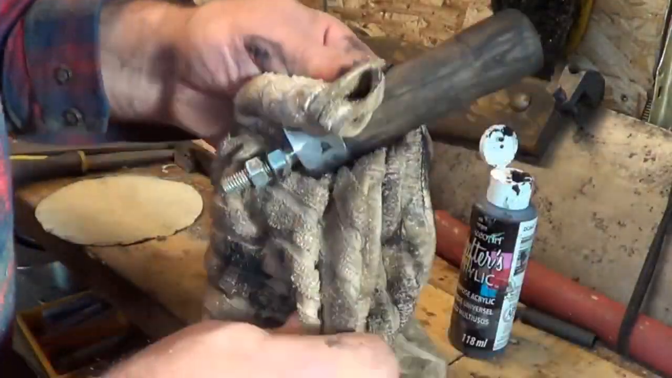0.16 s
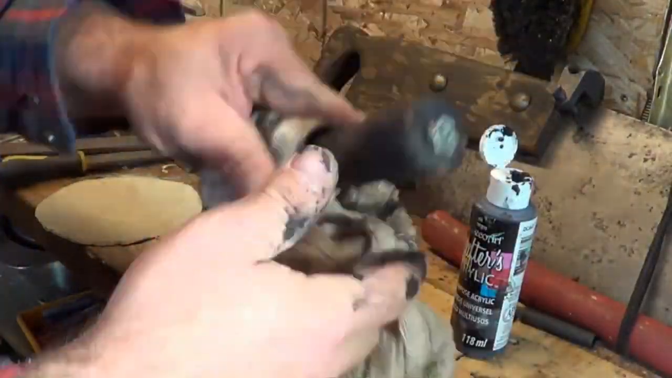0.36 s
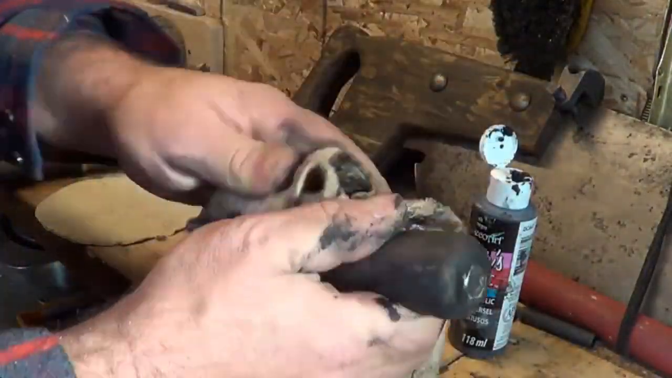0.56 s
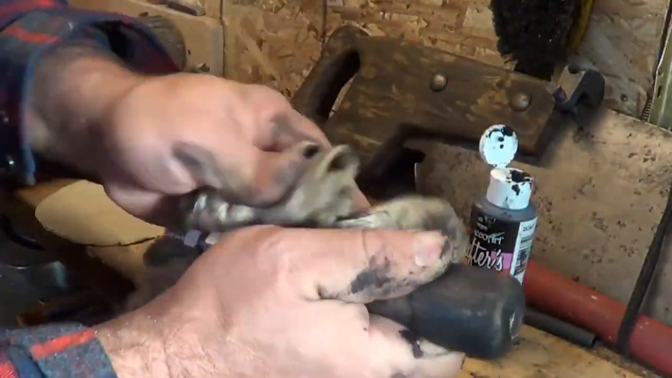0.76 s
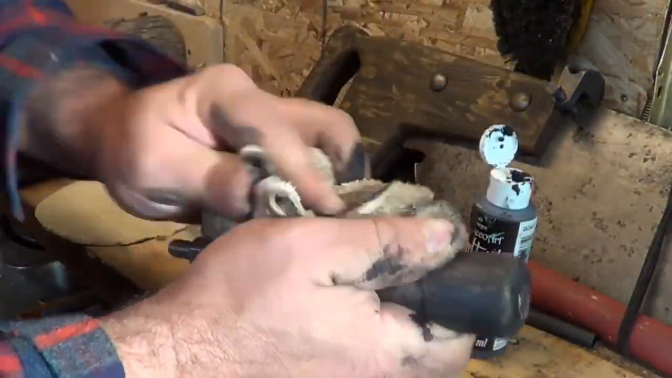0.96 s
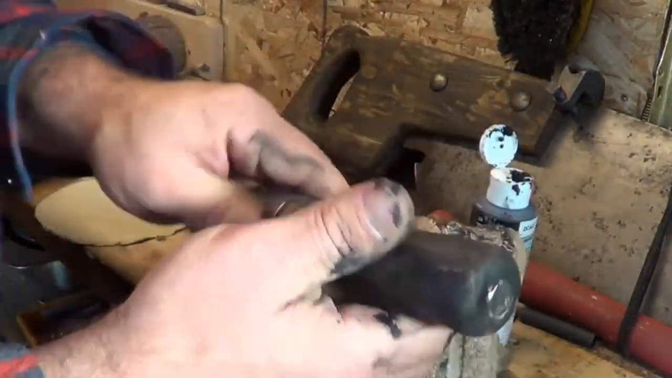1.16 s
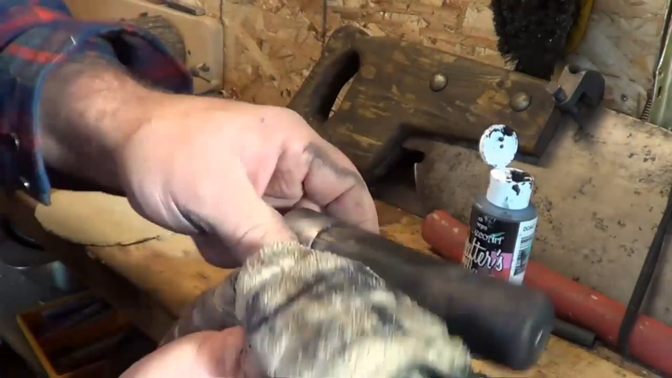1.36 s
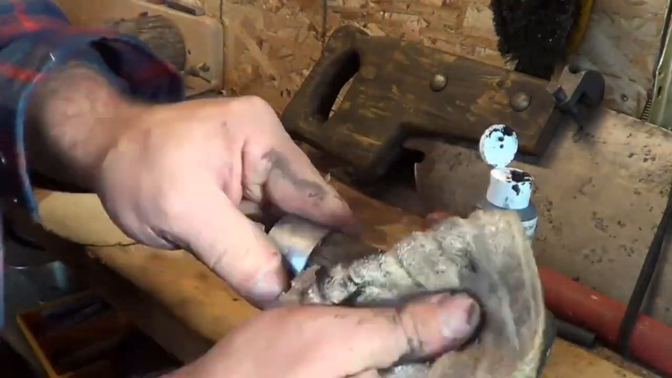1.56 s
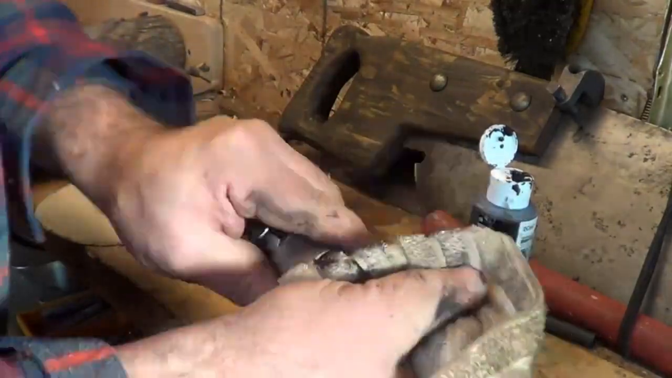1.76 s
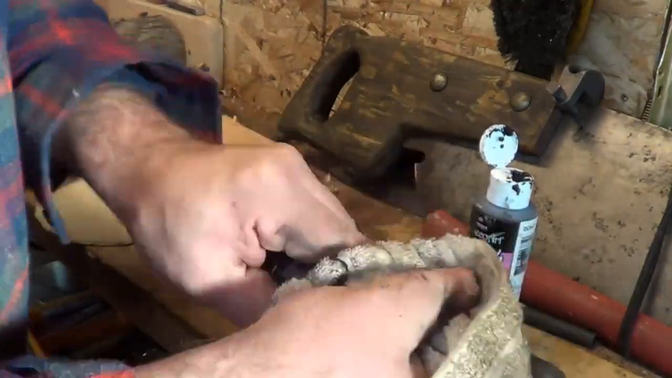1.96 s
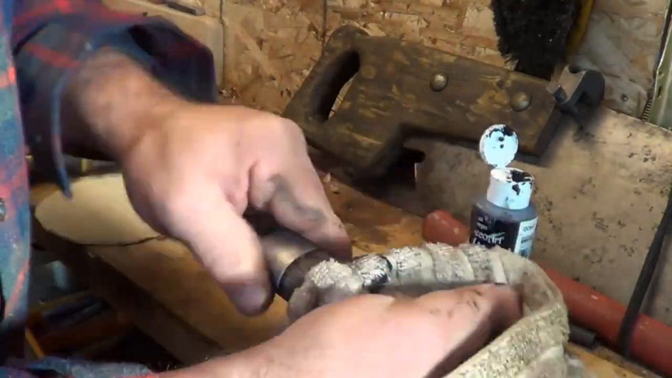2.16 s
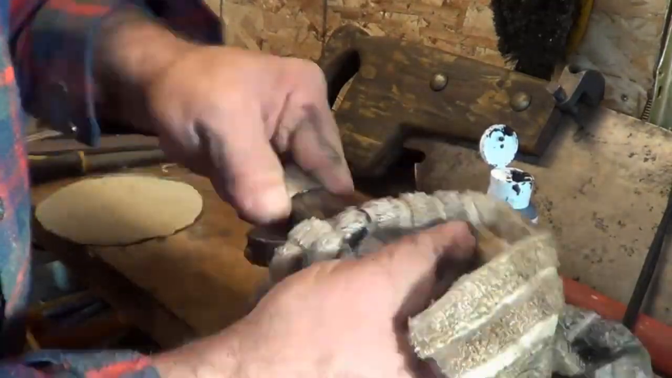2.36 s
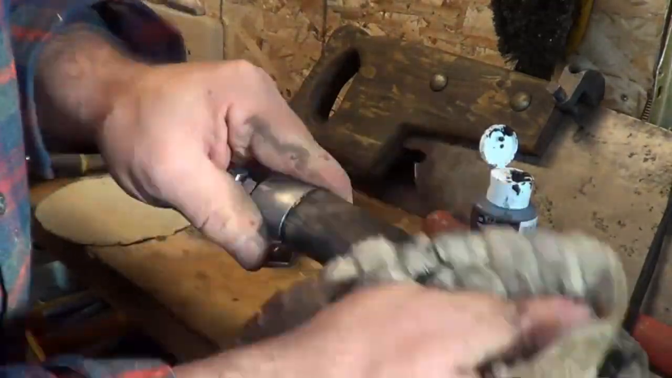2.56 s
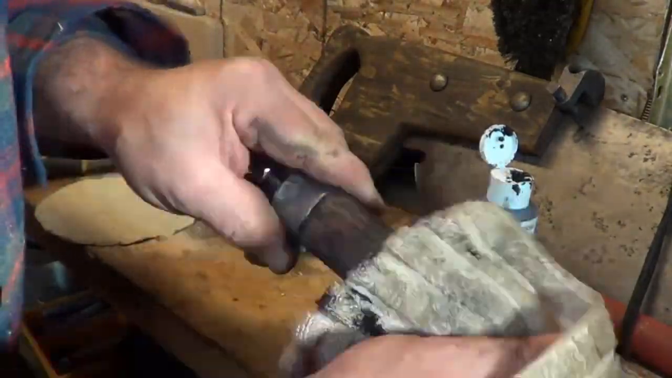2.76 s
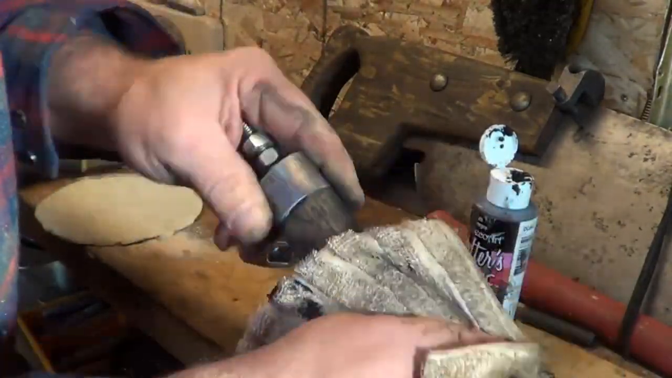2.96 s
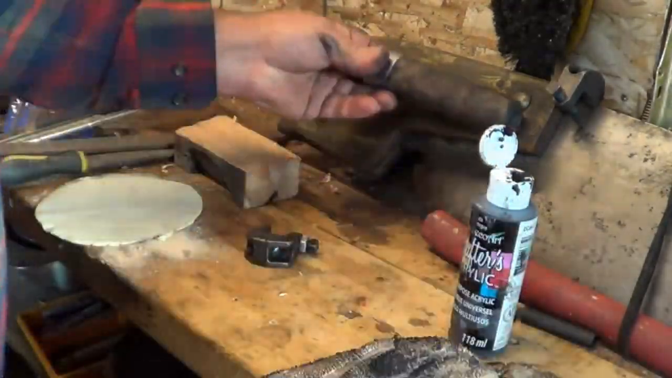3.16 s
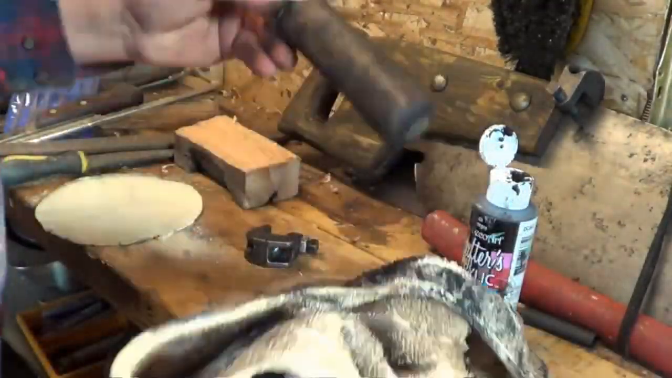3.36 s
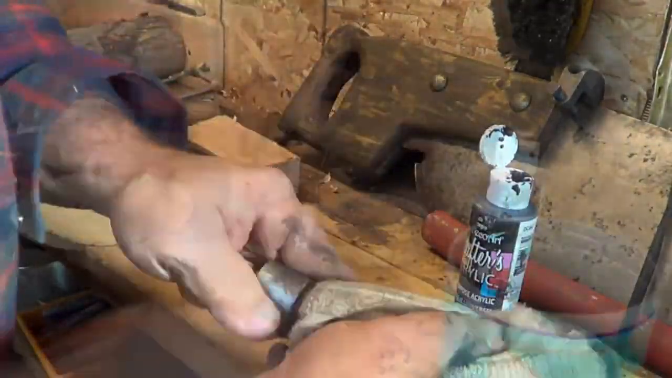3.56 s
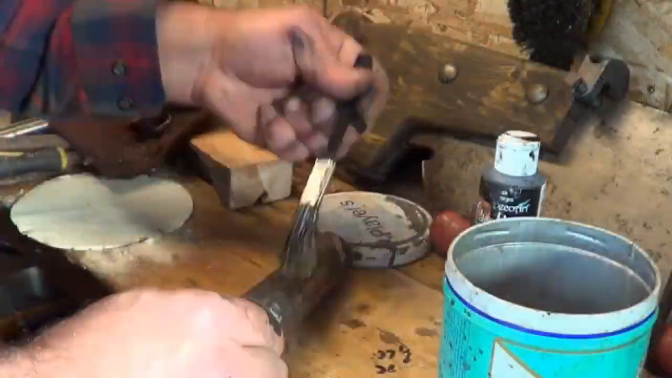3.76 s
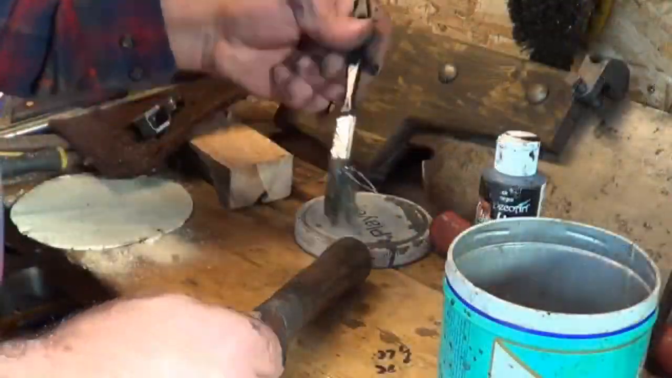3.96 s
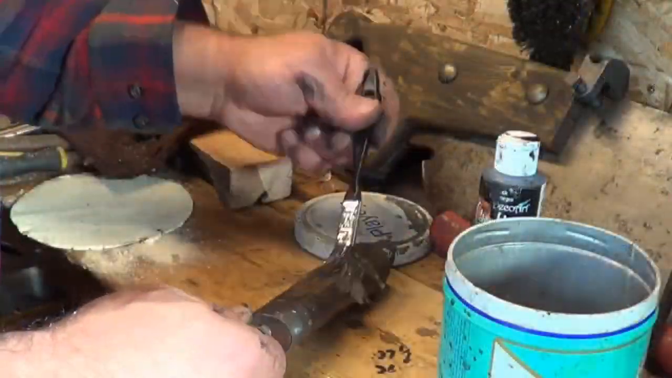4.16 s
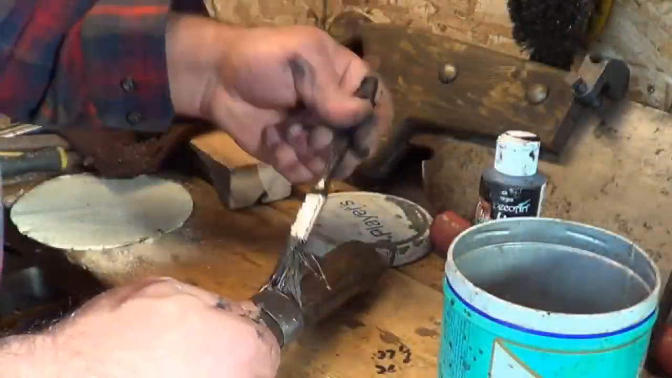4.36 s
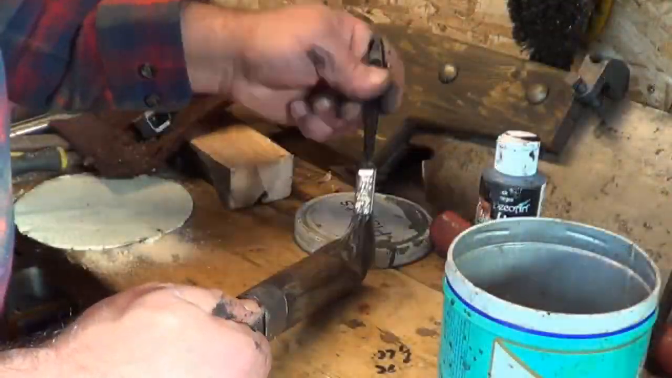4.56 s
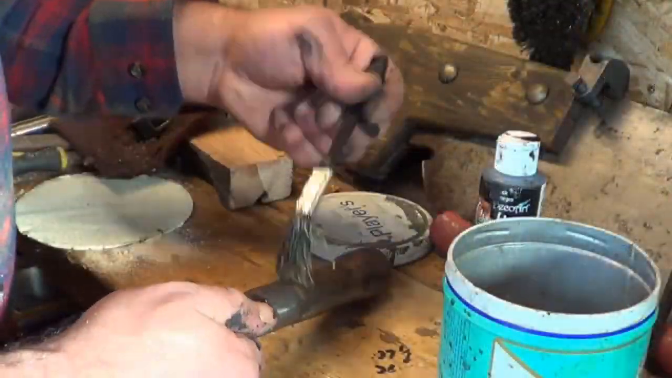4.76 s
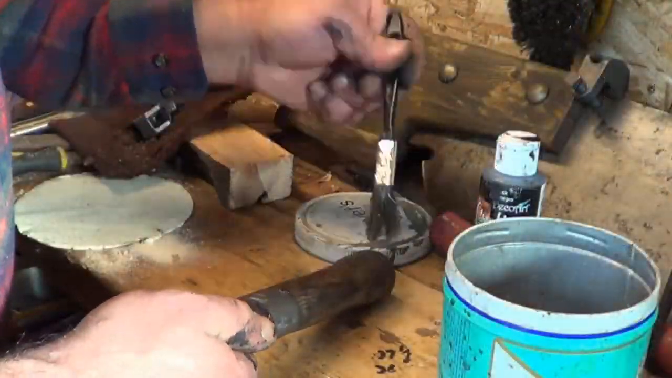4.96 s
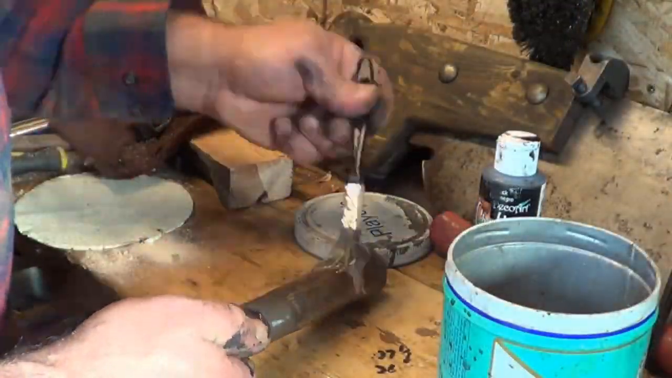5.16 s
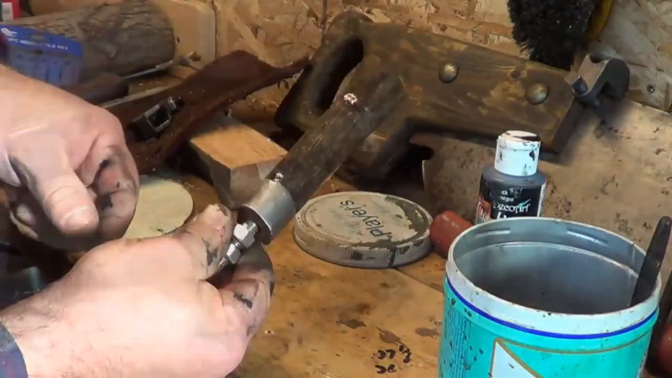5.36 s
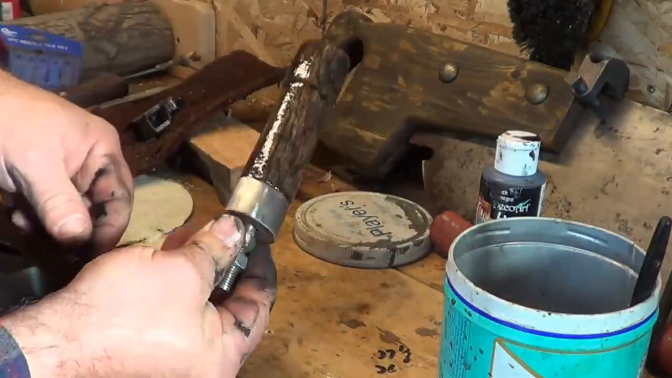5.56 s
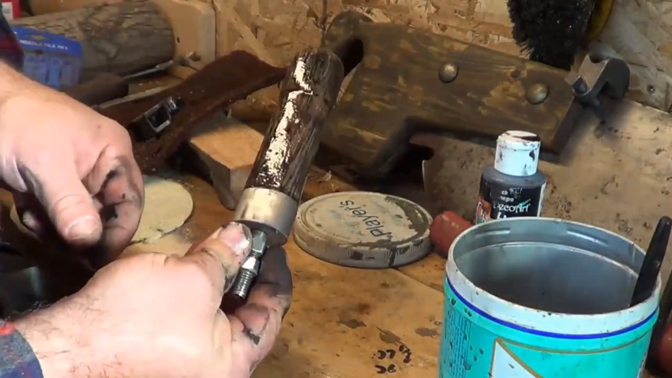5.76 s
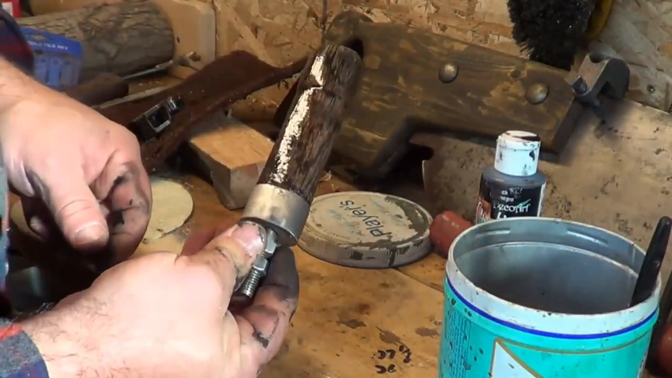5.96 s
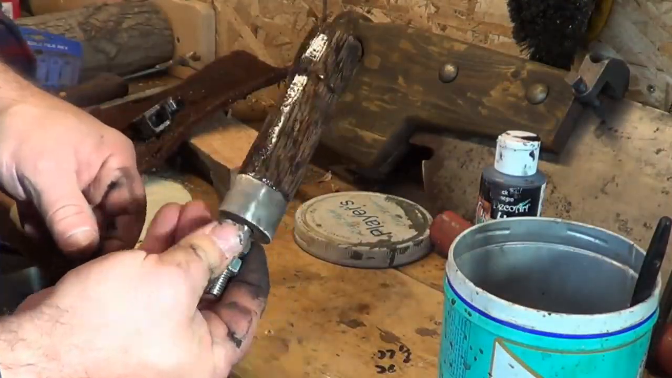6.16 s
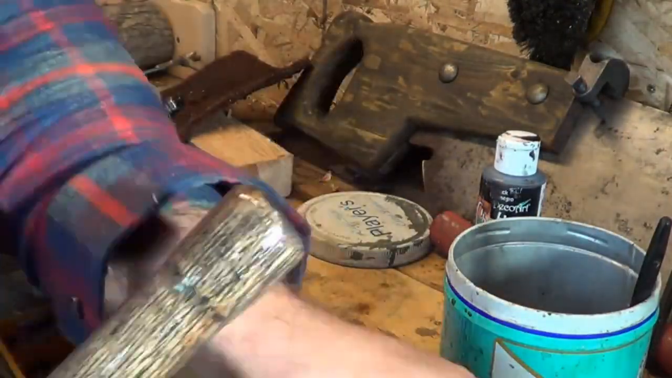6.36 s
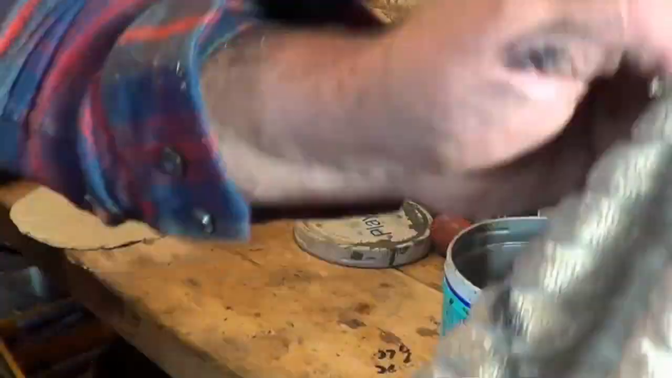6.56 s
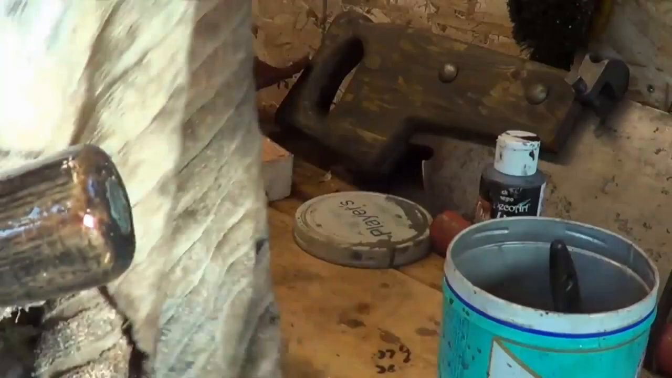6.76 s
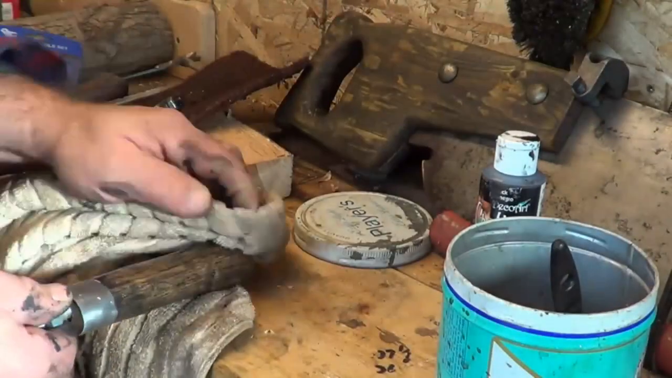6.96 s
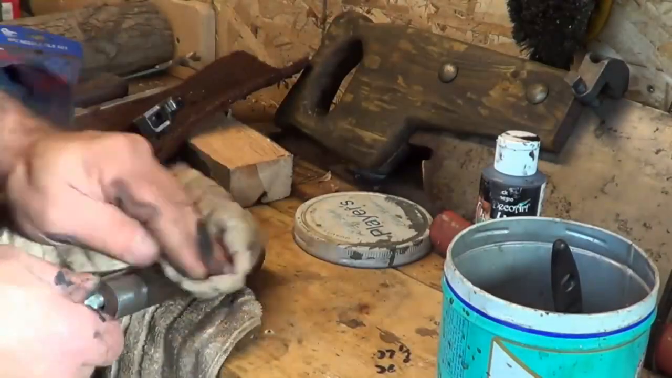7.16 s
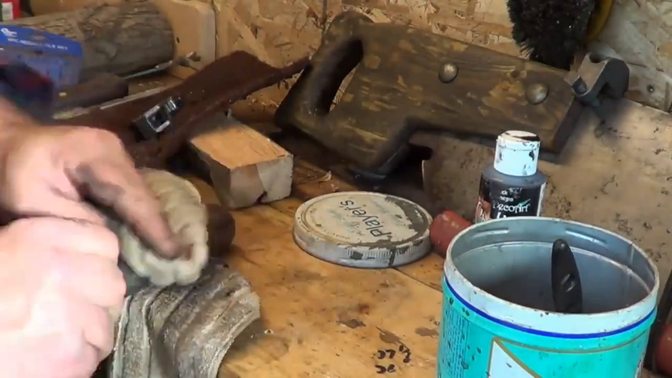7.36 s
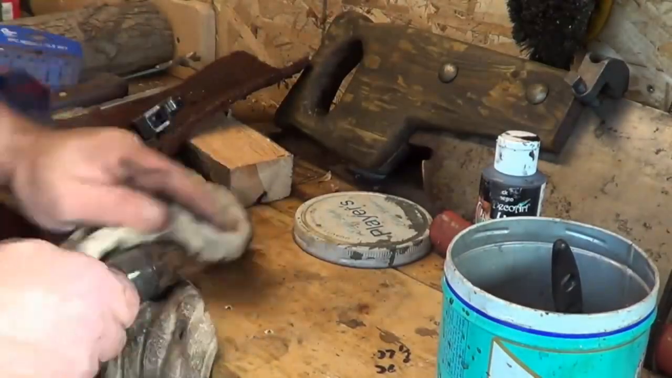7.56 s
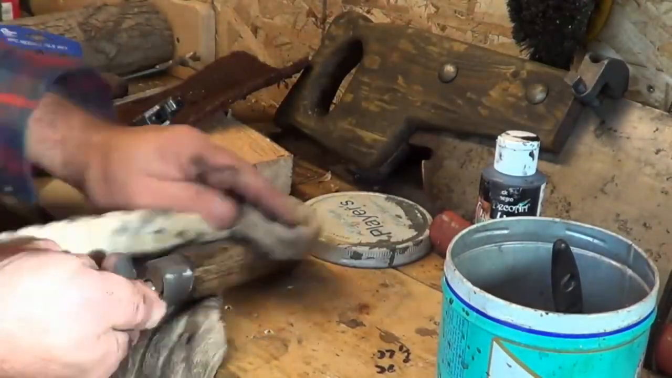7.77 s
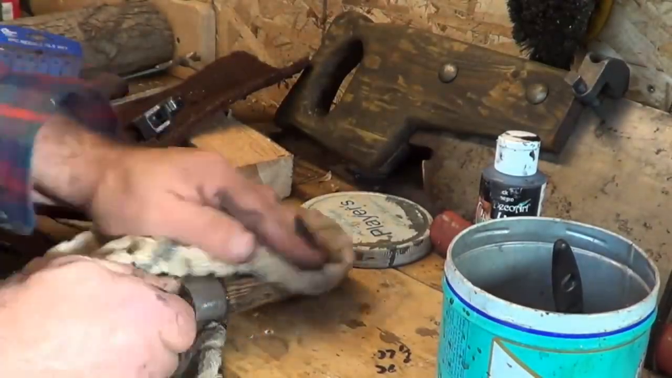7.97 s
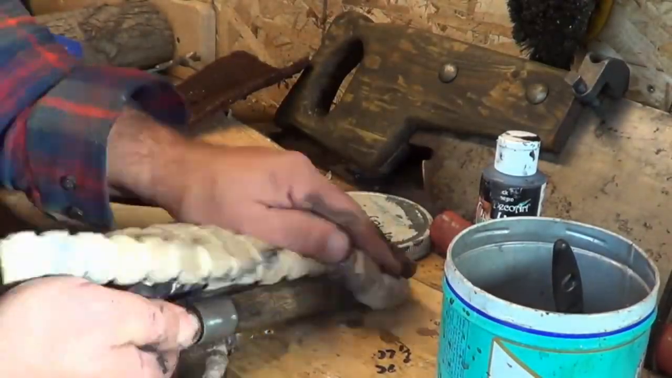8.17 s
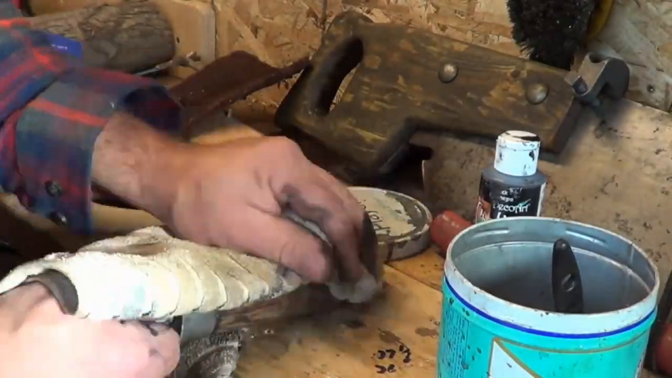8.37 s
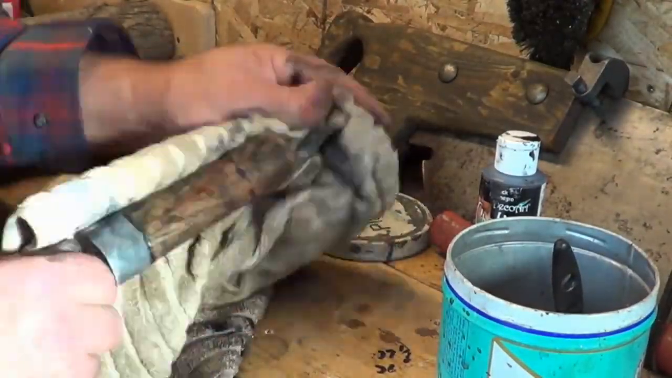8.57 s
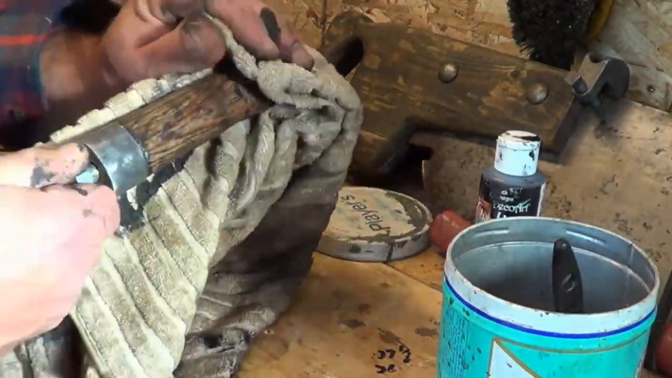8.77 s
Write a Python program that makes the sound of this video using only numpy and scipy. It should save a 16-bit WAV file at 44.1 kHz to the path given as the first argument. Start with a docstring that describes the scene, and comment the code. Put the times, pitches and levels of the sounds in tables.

```python
"""A rag scrubs a wooden tool handle in quick, hissing strokes, close up at a workbench.
The handle is knocked once and rings. A brush swishes oil onto it, its steel bolt clinks, and the rag
wipes it again while it bumps on the bench, once very hard. Rubbing is made of countless tiny slips;
each blow is a crack plus fading tones. Now and then something squeaks, very high and short.
Behind it all lies a small, dry workshop with a faint hum and a thin whine."""
import sys
import numpy as np
from scipy import signal
from scipy.fft import rfft, irfft, next_fast_len
from scipy.io import wavfile
from scipy.ndimage import uniform_filter1d

SR = 44100
rng = np.random.default_rng(int(sys.argv[2]) if len(sys.argv) > 2 else 0)


def dump(signal):
    """Clip the signal to [-1, 1] and save it as 16-bit WAV at the path in sys.argv[1]."""
    limited = np.clip(np.atleast_2d(signal).T, -1, 1)
    pcm = np.round(limited * 32767).astype(np.int16)
    wavfile.write(sys.argv[1], SR, pcm)


N = 392490
TOP_HZ = 15900  # the treble ends here


# Bouts of scrubbing. Each row: first and last stroke in seconds, number of strokes, hurry (above 0
# speeds up), share of each stroke spent sliding, first and last level in dB, sheen in dB.
# Sheen is the highest part of the hiss; its level counts from that of the stroke.
SCRUB_BOUTS = [(0.655, 0.891, 6, 0.18, 0.56, -51, -48.5, -4), (1.555, 1.673, 3, 0, 0.95, -56, -51.5, -7),
               (3.507, 3.695, 3, 0.23, 0.24, -60, -57, 1), (7.092, 7.2, 3, 0, 0.6, -53.5, -53, -3),
               (7.253, 7.52, 7, 0, 0.7, -51.5, -51.5, -4), (7.592, 7.904, 8, -0.13, 0.58, -52.5, -49.5, -5),
               (8.028, 8.179, 4, 0.033, 0.62, -51.5, -54, 0)]
# Single pulls of the rag. Each row: middle in seconds, length in seconds, level in dB, sheen in dB.
RAG_PULLS = [(.013, 0.051, -55.5, -6), (.255, 0.063, -56, -8), (.525, 0.078, -56, -2),
             (.933, .021, -43.5, -7), (.977, 0.026, -46.5, -3), (1.018, 0.035, -47.5, -10),
             (1.39, .11, -59, -3), (1.517, 0.025, -52, -6), (1.768, 0.041, -42.5, -8),
             (1.853, 0.057, -46.5, -7), (1.94, 0.053, -45.5, -13), (2.057, 0.06, -46.5, -11),
             (2.138, .048, -43.5, -13), (2.226, 0.042, -46.5, -14), (2.312, 0.05, -47, -8),
             (2.42, 0.083, -49.5, -9), (2.51, 0.064, -52, -14), (2.572, 0.074, -51, -4),
             (2.632, 0.023, -51.5, -4), (2.66, .016, -59, -4), (2.76, 0.081, -56, -3),
             (2.826, .014, -58, 3), (2.99, 0.13, -57, -3), (7.563, .025, -50, -6), (7.937, .016, -56, -6),
             (7.98, .025, -59, -6), (8.228, .025, -55, -10), (8.27, .06, -57, -3), (8.38, 0.078, -59, 1),
             (8.675, .025, -60, 1), (8.735, .035, -61, 0), (8.87, 0.078, -61, 2)]
def strokes():
    """List every stroke like a pull: the rag slides, then rests while the hand turns."""
    rows = list(RAG_PULLS)
    for first, last, count, hurry, share, first_db, last_db, sheen_db in SCRUB_BOUTS:
        progress = np.linspace(0, 1, count)
        times = first + (last - first) * (progress + hurry * progress * (1 - progress))
        db = first_db + (last_db - first_db) * progress
        rows += zip(times, share * np.gradient(times), db, np.full(count, sheen_db))
    return rows


# The tone colour of the rag's hiss and of its sheen. Each row: frequency in Hz, level in dB.
RAG_COLOUR = [(300, -46), (600, -23), (1500, -14), (2600, -11), (4500, -3), (7700, -1.5), (10400, -4.5),
              (14500, -3), (15800, -7)]
SHEEN_COLOUR = [(6000, -45), (10500, -16), (12000, -4), (14000, 3), (15300, -4), (15900, -6)]
def scrubbing(grab_steepness=4.1, let_go_steepness=3.7):
    """The rag hisses as each stroke grabs, slides and stops; its finest fibres add a crisp sheen."""
    t, hiss_gain, sheen_gain = np.arange(N) / SR, np.zeros(N), np.zeros(N)
    for s, length, db, sheen_db in strokes():
        near = slice(max(int((s - length) * SR), 0), int((s + length) * SR))
        steepness = np.where(t[near] < s, grab_steepness, let_go_steepness)
        stroke = amp(db) * np.exp(-(abs(t[near] - s) / (length / 2)) ** steepness)
        hiss_gain[near] += stroke
        sheen_gain[near] += amp(sheen_db) * stroke
    hiss = hiss_gain * friction(RAG_COLOUR, grain_db=1, catch_db=1.5, side_db=-8)
    sheen = sheen_gain * friction(SHEEN_COLOUR, grain_db=6, catch_db=3, side_db=-23)
    return (hiss + sheen) * pan(-.4)


# Pitches that rubbing wakes in and around the handle. Each row: pitch in Hz, width in Hz, boost in dB.
RUB_PEAKS = [(1277, 16, 6.5), (1743, 130, 3), (2426, 76, 5), (2754, 69, 6.5), (3296, 67, 5.5),
             (3675, 86, 4.5), (4030, 95, 3)]
def friction(points, grain_db, catch_db, side_db):
    """Countless tiny slips of uneven size, bunching up as the fibres catch and let go."""
    slips = noise(N, side_db) * amp(grain_db * wander(2500) + catch_db * wander(70))
    return colour(slips, points, RUB_PEAKS)


# How loud the loose cloth is. Each row: time in seconds, level in dB.
RUSTLE_LEVELS = [(0, -57.5), (.35, -57.5), (.62, -53.5), (.8, -58), (1.12, -61.5), (1.35, -54), (1.6, -57),
                 (2.05, -53.5), (2.35, -59.5), (3, -58), (3.3, -71), (3.5, -55), (3.7, -69)]
# Its tone colour. Each row: frequency in Hz, level in dB.
RUSTLE_COLOUR = [(200, -24), (600, -5), (1300, 1.5), (2000, 2.5), (3600, 2), (6000, -1.5), (10400, -4),
                 (14500, -2.5), (15800, -5.5)]
def rustling():
    """Loose folds of the rag rustle as they shift in the hand."""
    folds = friction(RUSTLE_COLOUR, grain_db=.5, catch_db=3, side_db=-5.5)
    return folds * loudness(RUSTLE_LEVELS) * pan(1)


# Soft slides of hand, handle, rag and sleeve. Each row: middle in seconds, length in seconds, centre pitch in
# Hz, level in dB.
SOFT_SLIDES = [(0.632, 0.13, 3420, -49.5), (1.317, 0.13, 3900, -56), (2.029, 0.24, 2500, -56.5),
               (5.656, 0.062, 1200, -67), (5.792, 0.083, 3000, -59), (5.868, 0.056, 2570, -54.5),
               (6.15, .09, 1210, -67), (6.392, .16, 3500, -55)]
# Their tone colour. Each row: multiple of the centre pitch, level in dB.
SLIDE_COLOUR = [(.25, -38), (.6, -16), (.78, -3.5), (1.15, -2.5), (1.4, -7.5), (2.2, -21), (4, -35)]
def sliding():
    """The hand, the handle, the rag and a sleeve slide past one another: a soft swish that swells and fades."""
    t, out = np.arange(N) / SR, np.zeros((2, N))
    for s, length, hz, db in SOFT_SLIDES:
        near = t[abs(t - s) < 1.5 * length]
        slips = noise(len(near), -11) * amp(wander(2500, len(near)))
        swish = colour(slips, [(ratio * hz, band_db) for ratio, band_db in SLIDE_COLOUR], RUB_PEAKS)
        swell = np.exp(-2 * ((near - s) / length) ** 2)
        add(out, near[0], amp(db) * swish * swell * pan(3.3))
    return out


# How loud the brush is; it lifts once. Each row: time in seconds, level in dB.
BRUSH_LEVELS = [(3.7, -71), (3.86, -56), (4.03, -55.5), (4.22, -59.5), (4.75, -56), (4.83, -58),
                (4.89, -65), (4.98, -57.5), (5.2, -60.5), (5.33, -62)]
# Its tone colour. Each row: frequency in Hz, level in dB.
BRUSH_COLOUR = [(300, -25), (900, -9.5), (1900, -8), (2650, 1.5), (3150, -3.5), (3750, -0.5), (4600, -13),
                (7000, -15.5), (15800, -15)]
def brushing():
    """Wet bristles swish softly along the wood, and now and then one flicks."""
    swish = friction(BRUSH_COLOUR, grain_db=2.5, catch_db=1, side_db=-6.5) + amp(-17) * crackle()
    return swish * loudness(BRUSH_LEVELS) * pan(1.3)


# How loud the wiping is. Each row: time in seconds, level in dB.
WIPE_LEVELS = [(6.4, -62.5), (6.95, -59.5), (7.3, -56.5), (7.75, -51), (7.98, -57.5), (8.22, -50),
               (8.37, -61.5), (8.48, -53), (8.62, -59.5), (8.9, -60.5)]
# The tone colour of the wiped handle. Each row: frequency in Hz, level in dB.
WIPE_COLOUR = [(150, -39), (350, -18.5), (650, -7.5), (1200, 0), (1900, -2), (2800, -1), (4500, -7.5),
               (7000, -12.5), (15800, -31)]
def wiping():
    """The rag drags on the oiled wood: the handle murmurs under a finer hiss of fibres."""
    murmur = friction(WIPE_COLOUR, grain_db=1.5, catch_db=2, side_db=-12.5)
    hiss = friction(RAG_COLOUR, grain_db=2.5, catch_db=2, side_db=-2.5) + amp(-11.5) * crackle()
    return (murmur + amp(-.5) * hiss) * loudness(WIPE_LEVELS) * pan(.68)


def crackle(snaps_per_s=45, spread_db=4):
    """Single fibres and bristles snag and flick free in tiny snaps of uneven size."""
    snags = rng.random(N) < snaps_per_s / SR
    return colour(snags * noise(N, -6) * amp(spread_db * rng.standard_normal(N)), RAG_COLOUR)


# Small, crisp ticks. Each row: start in seconds, relative level in dB.
TICKS = [(0.395, -38), (4.671, -39), (4.9356, -34), (6.018, -40), (6.5282, -25.5), (6.792, -30.5),
         (8.1494, -34), (8.2195, -29)]
def ticks():
    """Fibres, bristles and fingers give off tiny bright snaps."""
    out, t = np.zeros((2, N)), np.arange(SR // 10) / SR
    for s, db in TICKS:
        add(out, s, amp(db - 15.5) * colour(noise(len(t), -7), RAG_COLOUR) * fade(t, .067))
    return out


# Knocks on the handle. Each row: start in seconds, level in dB, brightness in Hz.
HANDLE_KNOCKS = [(1.44, -59.5, 1700), (2.843, -58, 1400), (3.1917, -25.5, 14000), (3.1985, -27.5, 5500),
                 (3.42, -58, 950), (4.49, -64, 646), (6.529, -52.5, 9000)]
# The tones of the wood. Each row: pitch in Hz, level in dB, ring time in seconds.
HANDLE_TONES = [(457, -28, 0.091), (633, -10, 0.053), (820, -26, 0.71), (1294, 2, 0.015),
                (1650, -1.5, 0.033), (1960, -4, 0.056), (2690, 0, 0.036), (2847, 12, 0.035),
                (3150, 3, 0.034), (3350, 1, .04), (3750, -5, 0.032), (4100, 2, 0.045), (4280, 1.5, 0.038),
                (4800, -17, 0.032)]
# The tone colour of its crack. Each row: frequency in Hz, level in dB.
HANDLE_CRACK = [(150, -21), (400, -28), (650, 2), (950, -2), (1400, -2), (3000, -7), (4500, 3),
                (6000, -15.5), (15800, -31)]
def handle_knocks():
    """The bare wood rings from one sharp knock and a few faint taps."""
    return strike(HANDLE_KNOCKS, HANDLE_TONES, HANDLE_CRACK, crack_db=-9, snap_db=-13,
                  hold_s=.0014, fade_s=.063, side_db=-13, low_hz=494) * pan(-1.7)


# Clinks of the bolt. Each row: start in seconds, level in dB, brightness in Hz.
BOLT_CLINKS = [(6.718, -22.5, 18400), (6.7255, -33.5, 14400)]
# The tones of the steel. Each row: pitch in Hz, level in dB, ring time in seconds.
BOLT_TONES = [(1197, -11.5, 0.087), (1430, -11.5, 0.085), (1854, -10, 0.079), (2360, -5, .065),
              (2410, -5, 0.078), (2580, 1.5, 0.081), (2850, -9, .07), (3100, -8, 0.066), (3574, -3.5, 0.11),
              (7160, 0, 0.033), (10340, -4.5, .055), (12480, 7, .045), (12850, -1, 0.05), (13110, -9, .047),
              (14900, 4, .053), (15200, -1, .043)]
# The tone colour of its crack. Each row: frequency in Hz, level in dB.
BOLT_CRACK = [(200, -35), (600, -21), (1200, -7), (2500, 5), (4500, 1), (7000, 2), (9500, -3), (14500, 3),
              (15800, 0.5)]
def bolt_clinks():
    """The steel bolt clinks brightly and bounces once."""
    return strike(BOLT_CLINKS, BOLT_TONES, BOLT_CRACK, crack_db=-3.5, snap_db=7,
                  hold_s=.0012, fade_s=.09, side_db=-14, low_hz=650) * pan(-1.6)


# Bumps on the bench; the first row is a muffled thud as the rag is pulled. Each row: start in seconds, level in
# dB, brightness in Hz.
BENCH_BUMPS = [(6.748, -54.5, 450), (6.773, -47.5, 1030), (6.792, -48.5, 2000), (7.3305, -35.5, 1550),
               (7.39, -47, 1940), (7.576, -42, 1590), (7.62, -52, 900), (7.675, -49.5, 1830),
               (7.76, -47.5, 1190), (7.775, -47, 1410), (7.907, -44, 1910), (8.04, -50.5, 1800),
               (8.146, -44, 1750), (8.22, -43, 3620), (8.265, -45, 2320), (8.3005, -35.5, 2270),
               (8.3085, -42.5, 3400), (8.4055, -13, 9900), (8.477, -49.5, 1690)]
# The tones of the bench. Each row: pitch in Hz, level in dB, ring time in seconds.
BENCH_TONES = [(1254, -7, 0.041), (1484, 0, 0.056), (1806, -2, 0.067), (1937, -1, 0.081), (2170, -10, 0.1),
               (2410, -12, 0.1), (2570, -3, 0.07), (2890, 5, 0.055), (2990, -8, 0.079), (3070, -4, 0.08),
               (3420, -5, 0.06), (3780, -1, 0.041), (3890, 0.5, 0.06), (4073, -3, 0.055), (4420, -13, .057),
               (4930, -8, .05)]
# The tone colour of its crack. Each row: frequency in Hz, level in dB.
BENCH_CRACK = [(200, -35), (460, -34), (660, -6.5), (850, -11.5), (1250, -3.5), (2000, -2), (3000, 4),
               (4000, -0.5), (6000, -9), (8500, -28), (11500, -43), (14000, -17), (15800, -28)]
def bench_bumps():
    """The handle bumps the bench, which rings along with the things lying on it; once, the pulled rag gives a
    muffled thud."""
    return strike(BENCH_BUMPS, BENCH_TONES, BENCH_CRACK, crack_db=0, snap_db=-15,
                  hold_s=.0084, fade_s=.06, side_db=-11.5, low_hz=570, hollow_db=-1.5) * pan(.55)


def strike(blows, tones, crack_colour, crack_db, snap_db, hold_s, fade_s, side_db, low_hz,
           hollow_db=-30):
    """Each blow snaps and sets tones ringing; near walls and clutter hold its crack for a moment."""
    out, t = np.zeros((2, N)), np.arange(SR // 2) / SR
    attack = SR // 125  # the first 8 ms set the level
    crack_shape = fade(np.maximum(t - hold_s, 0), fade_s) + amp(snap_db) * np.exp(-t / .00074)
    for s, db, bright_hz in blows:
        ring = 0
        for hz, tone_db, ring_s in tones:
            phase = 2 * np.pi * rng.random()
            phase += amp(side_db) * rng.standard_normal() * np.array([[1], [-1]])
            ring += amp(tone_db) * fade(t, ring_s) * np.sin(2 * np.pi * hz * t + phase)
        crack = amp(crack_db) * colour(noise(len(t), side_db), crack_colour) * crack_shape
        sound = ring / ring[:, :attack].std() + crack
        # a blow cushioned by cloth is a weight on a spring: hollow at its own pitch, dull above it
        sound += amp(hollow_db) * signal.lfilter(*signal.iirpeak(bright_hz, 5, fs=SR), sound)
        dull_hz = min(1.24 * bright_hz, SR * .47)
        sound = signal.sosfilt(signal.butter(4, dull_hz, fs=SR, output="sos"), sound)
        # small things give off little bass
        sound = signal.sosfilt(signal.butter(3, low_hz, "high", fs=SR, output="sos"), sound)
        add(out, s, amp(db) * sound / sound[:, :attack].std())
    return out


# The tone colour of the bench top's thud. Each row: frequency in Hz, level in dB.
THUD_COLOUR = [(25, -10), (70, -2), (125, 1), (200, -3), (280, -1), (350, -8), (450, -19), (600, 5),
               (750, -5), (2000, -40)]
def bench_thud():
    """The hardest bump also shoves the heavy bench top, which answers with a short, dull thud."""
    out, t = np.zeros((2, N)), np.arange(SR // 2) / SR
    hardest_s = max(BENCH_BUMPS, key=lambda bump: bump[1])[0]
    add(out, hardest_s, amp(-47) * colour(noise(len(t), -4), THUD_COLOUR) * fade(t, .06))
    return out * pan(3)


# Thin squeals. Each row: start in seconds, length in seconds, pitch in Hz, width in Hz, level in dB.
RAG_SQUEALS = [(6.588, 0.06, 5600, 2200, -55), (6.942, 0.084, 4880, 150, -62),
               (6.986, 0.03, 3650, 200, -57), (7.038, 0.07, 5000, 110, -55.5), (7.094, .04, 4720, 110, -56),
               (7.123, 0.078, 4870, 110, -53.5)]
def squeals(arch_hz=259, sag_hz=200, rasp_db=3):
    """The rag squeals as it tightens on the wood; the pitch rises in the middle and ends lower."""
    out = np.zeros((2, N))
    for s, length, hz, width_hz, db in RAG_SQUEALS:
        progress = np.linspace(0, 1, int(length * SR))
        arch = abs(np.sin(np.pi * progress))
        squeal = airy_tone(hz + arch_hz * arch - sag_hz * progress, width_hz)
        rasp = amp(rasp_db * wander(width_hz / 10, len(progress)))
        add(out, s, amp(db) * np.sqrt(arch) * unit(squeal * rasp) * pan(3.2))
    return out


# Very high chirps. Each row: start in seconds, relative level in dB.
CHIRPS = [(4.225, -55), (5.46, -52), (6.015, -49), (6.446, -53), (7.04, -43.5), (7.507, -41), (8.035, -47),
          (8.472, -47)]
def chirps(slips=110, run_s=.048, slip_s=.0005, rise_s=.0093, decay_s=.027):
    """Each chirp is a ragged run of tiny slips: brief pings whose pitch scatters and falls."""
    start_hz, end_hz, scatter_hz = 14850, 10300, 950
    out, t = np.zeros((2, N)), np.arange(int(2 * run_s * SR)) / SR
    shape = np.minimum(t / rise_s, np.exp((rise_s - t) / decay_s)) / np.sqrt(2)
    for s, db in CHIRPS:
        progress = (np.arange(slips) + rng.random(slips))[:, None] / slips
        scatter, size, side = rng.standard_normal((3, slips, 1))
        hz = np.minimum(start_hz + (end_hz - start_hz) * progress + scatter_hz * scatter, TOP_HZ)
        age = np.maximum(t - progress * run_s, 0) / slip_s
        pings = amp(2 * size) * age * np.exp(-age) * np.sin(2 * np.pi * hz * age * slip_s)
        run = np.array([np.sum(pings * amp(ear * 4.2 * side), axis=0) for ear in (1, -1)])
        add(out, s, amp(db) * unit(run) * shape)
    return out * pan(3.2)


def room_echo(blows):
    """The small room gives the blows a faint tail, strongest in the low notes."""
    t = np.arange(SR // 2) / SR
    # Each pair: frequency in Hz, level in dB.
    room = [(100, 0), (170, 17), (250, 2), (350, 17), (1000, -3), (3000, -5), (15000, -12)]
    tail = colour(noise(len(t), 1), room) * fade(t, .3)
    tail /= np.sqrt(np.sum(tail ** 2) / 2)
    return amp(-24) * signal.fftconvolve(blows, tail, axes=1)[:, :N]


# Low booms after the knock and the clink. Each row: start in seconds, level in dB.
ROOM_BOOMS = [(3.197, -64.5), (6.735, -71)]
# The room's own tones. Each row: pitch in Hz, level in dB, ring time in seconds.
ROOM_TONES = [(166, -3, 0.28), (180, -4, 0.22), (354, -1, 0.14), (462, 2, .11)]
def room_booms(rise_s=.012):
    """The low tones of the room swell a moment after a blow and linger."""
    out, t = np.zeros((2, N)), np.arange(SR // 2) / SR
    for s, db in ROOM_BOOMS:
        ring = sum(amp(tone_db) * fade(t, ring_s) * np.sin(2 * np.pi * (hz * t + rng.random()))
                   for hz, tone_db, ring_s in ROOM_TONES)
        add(out, s, amp(db) * ring * (1 - np.exp(-t / rise_s)) * pan(0))
    return out


# The tone colour of the still air and of a lower wash of noise. Each row: frequency in Hz, level in dB.
AIR_COLOUR = [(30, -31), (90, -23.5), (180, -13), (330, -10.5), (650, -6), (1100, 0), (2000, 0.5),
              (2800, 1), (4200, 0.5), (6500, -5), (8800, -4.5), (10500, -7.5), (15800, -8)]
WASH_COLOUR = [(100, -23.5), (250, -24), (330, 0), (450, -12), (540, -4), (610, -12), (710, -1.5),
               (780, -10), (900, 2), (1220, 1.5), (1600, -1.5), (2450, 0.5), (4000, -6), (9000, -17.5)]
def room_air():
    """The room hisses softly; the level dips briefly, then a lower wash of noise sets in."""
    air = colour(noise(N, -3.5), AIR_COLOUR, RUB_PEAKS)
    air_db = -56.5 + .61 * wander(2.78) - 2.5 * gate(5.245, 5.435, .08)
    wash = colour(noise(N, -32), WASH_COLOUR, RUB_PEAKS) * gate(5.446, np.inf, .29)
    return (amp(air_db) * air + amp(-60) * wash) * pan(.55)


# Faint hums. Each row: start and end in seconds, pitch in Hz, waver in Hz, level in dB.
HUMS = [(0, 1.18, 196, 6.6, -89), (0, 2.26, 863, 8, -74.5), (3.65, 5.33, 194.5, 3, -82.5),
        (3.65, 4.8, 335, 12, -85)]
# Airy whistles. Each row: pitch in Hz, width in Hz, level in dB.
WHISTLES = [(5420, 230, -71.5), (12050, 550, -77)]
def hums_and_whine(whine_hz=8847):
    """Wavering hums and faint whistles come and go under a thin, steady electric whine."""
    hum = sum(amp(db) * gate(start, end, .15) * wavering_tone(hz, waver_hz, flutter_db=2.5)
              for start, end, hz, waver_hz, db in HUMS)
    whistle = sum(amp(db) * airy_tone(np.full(N, hz), width_hz) for hz, width_hz, db in WHISTLES)
    whine = amp(-77) * wavering_tone(whine_hz, 3, flutter_db=.5)
    whine += amp(-76) * airy_tone(np.full(N, whine_hz), 500)
    return (hum + whistle * gate(3.65, 5.28, .1) + whine) * pan(.55)


def wavering_tone(hz, waver_hz, flutter_db):
    """A pure tone whose pitch and level drift at random."""
    phase = 2 * np.pi * np.cumsum(hz + waver_hz * wander(40)) / SR
    return unit(np.sin(phase) * amp(flutter_db * wander(32)))


def airy_tone(hz, width_hz):
    """A narrow band of noise that follows a pitch given for every sample."""
    phase = 2 * np.pi * np.cumsum(hz) / SR
    return unit(wander(width_hz, len(hz)) * np.cos(phase) + wander(width_hz, len(hz)) * np.sin(phase))


def noise(n, side_db):
    """Stereo white noise; the lower side_db is, the more alike both ears are."""
    mid, side = rng.standard_normal((2, n))
    return mid + amp(side_db) * side * np.array([[1], [-1]])


def colour(x, points, peaks=()):
    """Give a sound a tone colour, with narrow peaks if wanted, at a strength of 1."""
    hz, db = np.transpose(points)
    n = next_fast_len(x.shape[-1])
    f = np.maximum(np.fft.rfftfreq(n, 1 / SR), 1)
    shape_db = np.interp(np.log(f), np.log(hz), db)
    shape_db += sum(boost / (1 + (2 * (f - centre) / width) ** 2) for centre, width, boost in peaks)
    return unit(irfft(rfft(x, n) * amp(shape_db), n)[..., :x.shape[-1]])


def wander(rate, n=N):
    """A random drift of about 1 either way, heading for a new value rate times a second."""
    steps = np.arange(n) * rate / SR
    count = int(steps[-1]) + 2
    return unit(np.interp(steps, np.arange(count), rng.standard_normal(count)))


def loudness(levels):
    """A volume curve through rows of time and level, with soft edges and silence outside."""
    t = np.arange(N) / SR
    times, db = np.transpose(levels)
    playing = 1. * ((t >= times[0]) & (t <= times[-1]))
    return amp(np.interp(t, times, db)) * uniform_filter1d(playing, SR // 20)


def gate(start_s, end_s, edge_s):
    """Rise, hold at 1 and fall."""
    t = np.arange(N) / SR
    return np.clip(np.minimum(t - start_s, end_s - t) / edge_s + .5, 0, 1)


def fade(t, ring_s):
    """Die away by 60 dB over the ring time."""
    return np.exp(-np.log(1000) * t / ring_s)


def amp(db):
    """Turn decibels into a volume factor."""
    return 10 ** (np.asarray(db) / 20)


def unit(x):
    """Scale to an average strength (rms) of 1."""
    return x / np.sqrt(np.mean(x ** 2))


def pan(db):
    """Make the left ear db louder than the right."""
    return amp(np.array([[db], [-db]]) / 2)


def add(out, s, sound):
    """Mix a stereo sound in at s seconds."""
    i = max(int(s * SR), 0)
    out[:, i:i + sound.shape[1]] += sound[:, :N - i]


def scene():
    """Rubbing, squeaks and blows at the bench, with the workshop behind."""
    rubbing = scrubbing() + rustling() + sliding() + brushing() + wiping()
    small_sounds = chirps() + squeals() + ticks()
    blows = handle_knocks() + bolt_clinks() + bench_bumps()
    after_blows = room_echo(blows) + bench_thud() + room_booms()
    return rubbing + small_sounds + blows + after_blows + room_air() + hums_and_whine()


def record(dry, ceiling=.74):
    """Round off the loudest peaks and cut the highest treble."""
    rounded = ceiling * np.tanh(dry / ceiling)
    return signal.sosfilt(signal.ellip(10, .2, 80, TOP_HZ, fs=SR, output="sos"), rounded)


dry = scene()
out = record(dry)
dump(out)
```